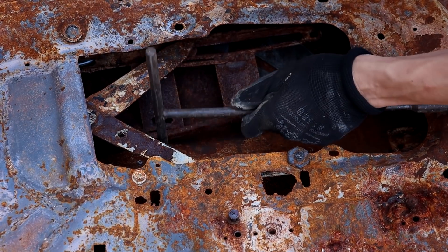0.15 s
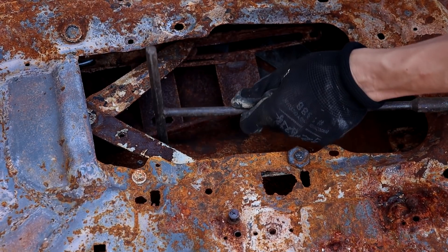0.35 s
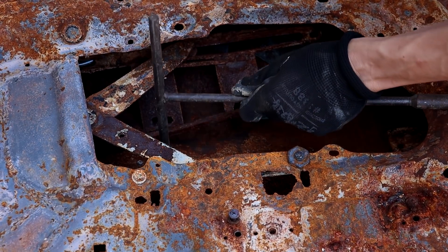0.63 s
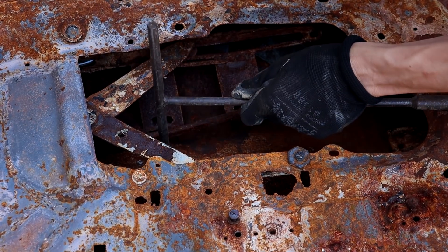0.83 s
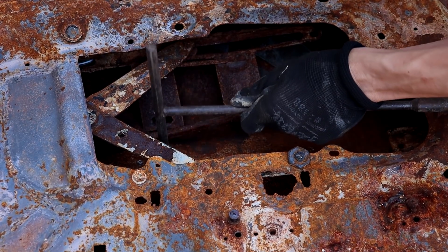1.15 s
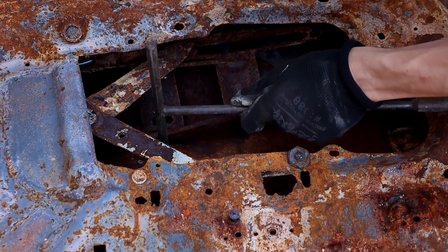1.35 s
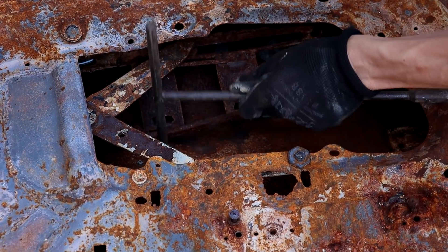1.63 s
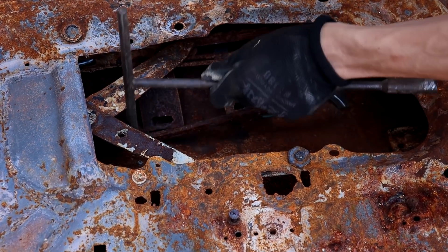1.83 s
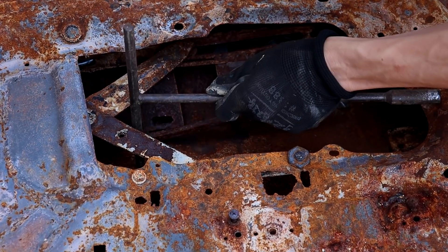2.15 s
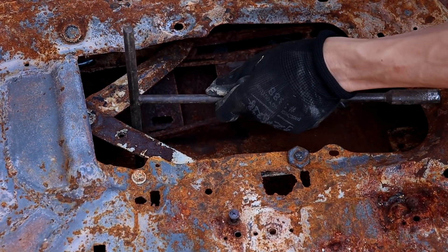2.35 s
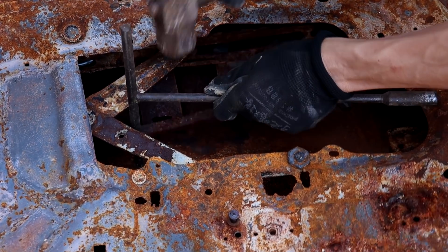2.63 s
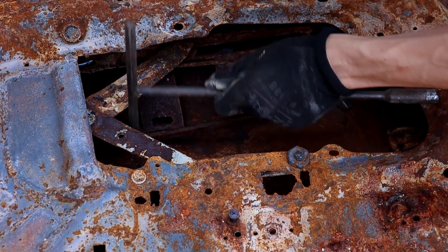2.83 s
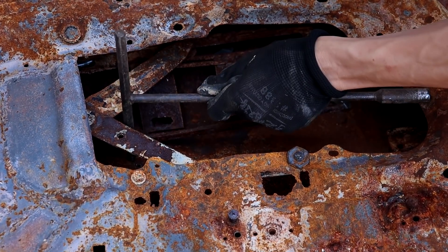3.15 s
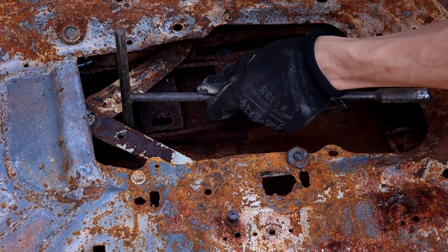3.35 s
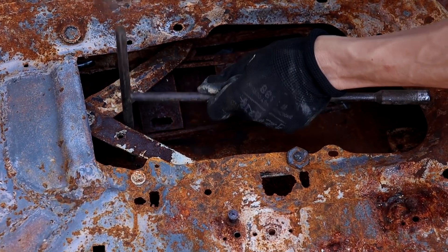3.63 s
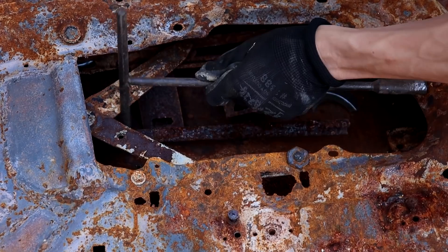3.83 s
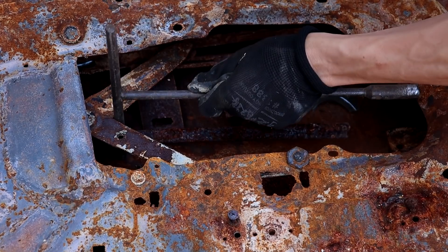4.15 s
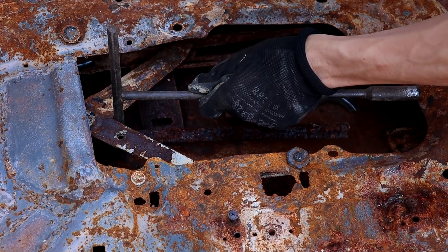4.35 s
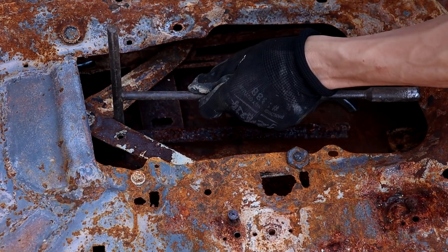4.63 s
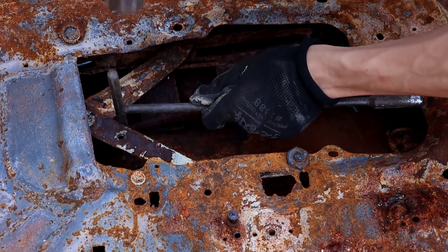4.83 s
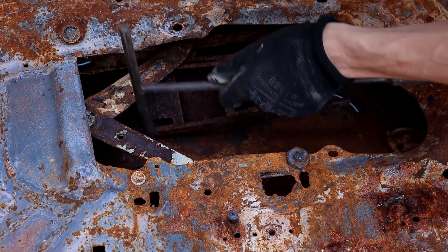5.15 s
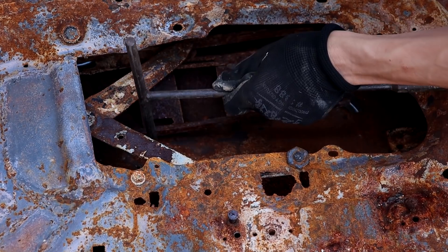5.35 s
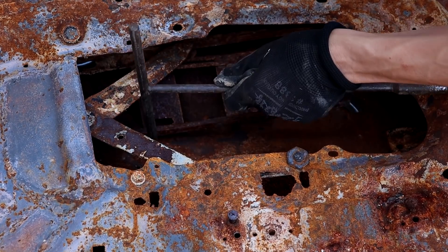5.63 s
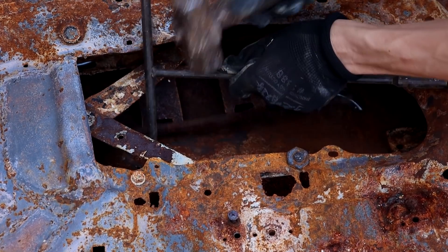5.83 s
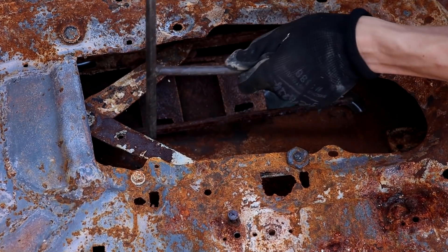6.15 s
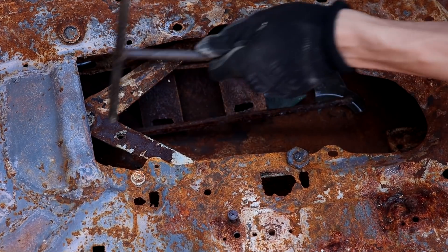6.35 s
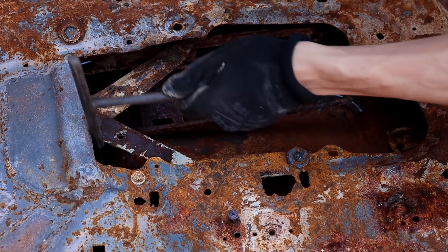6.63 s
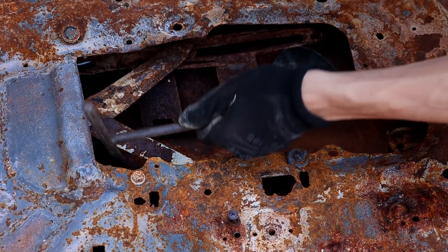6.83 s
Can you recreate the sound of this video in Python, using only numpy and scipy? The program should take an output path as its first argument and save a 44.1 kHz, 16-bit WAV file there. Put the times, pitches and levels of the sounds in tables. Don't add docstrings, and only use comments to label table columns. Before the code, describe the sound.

In a workshop, a hammer hits a steel rod against a hollow rusted sheet-metal body five times, about a second apart. Each blow is a sharp clipped crack with a short boom and a burst of rattling plates. Dull hollow thuds follow as the work drops back, and rust flakes tick down. The end has lighter knocks, rod ringing and a brief grating. Close stereo microphones, low machine murmur behind.

```python
import sys
import numpy as np
from scipy import signal
from scipy.fft import rfft, irfft, next_fast_len
from scipy.io import wavfile
from scipy.ndimage import uniform_filter1d

SR = 44100
rng = np.random.default_rng(int(sys.argv[2]) if len(sys.argv) > 2 else 0)


def transcribe(signal):
    frames = np.atleast_2d(signal).T
    limited = np.clip(frames, -1, 1)
    pcm = np.round(limited * 32767).astype(np.int16)
    wavfile.write(sys.argv[1], SR, pcm)


def amplitude_ratio(level_db):
    exponent = np.asarray(level_db, float) / 20
    return 10 ** exponent


N = 308259
TIME = np.arange(N) / SR
SIZE = next_fast_len(N + SR)
FREQ = np.maximum(np.arange(SIZE // 2 + 1) * SR / SIZE, 1)

# pitch_hz, level_db (per Hz)
SHOP_COLOUR = [(12, -42.5), (20, -12), (89, -3.5), (223, -5), (263, -10), (286, -17.5), (337, -3.5),
               (367, -11), (555, -12), (1460, -18), (1780, -17), (11700, -49), (15000, -60.5)]
# pitch_hz, side_minus_mid_db
SHOP_WIDTH = [(60, -25), (110, -27.5), (200, -13), (380, -6), (700, -5), (1290, 2.5), (2380, 2),
              (4400, 7.5), (8120, 7), (15000, 13.5)]
# time_s, gain_db
GAIN_DRIFT = [(0, 8.5), (.5, -1), (1.0, 0.5), (1.5, 4.5), (2.0, -1.5), (2.6, 2.5), (3.4, 0.5), (3.75, 2.5),
              (4.3, -2), (4.8, 5), (5.3, -2.5), (5.8, -5), (6.3, 0), (6.99, 1)]
SHOP_DB = -51
HUM_HZ, HUM_DB = 60, -58.5
DUCK_DB, DUCK_S = -10.5, 0.26

# pitch_hz, side_minus_mid_db
NEAR_WIDTH = [(60, -30.5), (110, -30.5), (200, -30.5), (380, -16), (700, -8.5), (1290, -3), (2380, 1.5),
              (4400, 4.5), (8120, 3.5), (15000, 9.5)]
# pitch_hz, left_minus_right_db
MICROPHONE_LEAN = [(60, -3), (110, 0.5), (200, -0.5), (380, 1.5), (700, 0), (1290, -1), (2380, -2.5),
                   (4400, 2), (8120, -1), (15000, -0.5)]

# time_s, level_db
GLOVE_LEVEL = [
    (0.63, -70),
    (0.676, -42.5),
    (0.726, -38.5),
    (0.758, -39),
    (0.822, -53),
    (0.86, -58.5),
]
# pitch_hz, level_db (per Hz)
GLOVE_COLOUR = [(530, -46), (900, -10.5), (2530, 1.5), (4540, -5.5), (4920, -9.5), (6710, -7),
                (11300, -13.5), (14000, -57)]
# time_s, pitch_hz
GLOVE_SQUEAK = [
    (0.66, 2160),
    (0.72, 2550),
    (0.76, 2940),
    (0.8, 2610),
]
SQUEAK_DB, SQUEAK_WIDTH_S = -6.5, 0.0027

# time_s, level_db
GRATE_LEVEL = [
    (6.735, -64.5),
    (6.765, -42),
    (6.8, -41.5),
    (6.84, -54),
    (6.88, -69.5),
]
# pitch_hz, level_db (per Hz)
GRATE_TONE = [(800, -19.5), (1500, -5.5), (2400, 1.5), (3700, -1.5), (4600, -15.5), (8500, -20),
              (12000, -33)]

# start_s, peak_db,
# centre_hz
TICKS_AND_CLANKS = [(0.5524, -52, 5200), (0.6478, -45, 4030), (0.8936, -40, 9230), (1.0994, -54, 4200),
                    (1.5894, -30, 4940), (1.8492, -48.5, 4540), (2.437, -50, 4350), (2.9041, -21, 7010),
                    (3.0046, -29.5, 7980), (3.02, -36.5, 9000), (2.92, -32.5, 9060), (3.113, -32.5, 7000),
                    (3.0694, -43, 5710), (3.3894, -57, 4440), (3.4292, -66, 5400), (3.441, -49.5, 5350),
                    (3.6681, -45.5, 4010), (3.7284, -50, 4715), (4.0402, -21.5, 4320), (4.473, -46.5, 4220),
                    (5.7129, -40, 4030), (6.284, -23.5, 1860), (6.31, -24, 1690), (6.7574, -44, 2600),
                    (6.79, -42, 2300)]
# start_s, pitch_hz, level_db, rise_s, t60_s
ROD_RINGS = [(.56, 302, -39.5, 0.075, 0.56), (1.52, 6420, -22, .002, 0.034),
             (2.115, 7230, -43, .003, 0.067), (3.77, 6250, -29, .005, 0.089), (3.795, 4340, -27, .01, 0.11),
             (3.87, 8890, -47, .04, 0.253), (3.888, 6008, -27.5, 0.011, .1),
             (3.899, 2620, -38.5, .05, 0.35), (3.931, 8300, -35, 0.015, 0.15),
             (4.005, 8300, -36, 0.023, 0.33), (5.567, 1794, -52, 0.062, .7), (5.61, 2380, -53, 0.019, 0.22),
             (5.72, 602, -46.5, .01, 0.35), (6.051, 7810, -45.5, 0.07, 0.44),
             (6.08, 6900, -48.5, .05, 0.37), (6.289, 3790, -42, 0.0036, .15),
             (6.29, 1700, -40, 0.009, 0.29), (6.29, 2256, -36, 0.0062, 0.25),
             (6.29, 5776, -56, 0.018, 0.63), (6.33, 3122, -55, 0.055, 0.93), (6.755, 3220, -44, .01, .12),
             (6.761, 3000, -39, 0.011, 0.29), (6.77, 3750, -45, .01, .12), (6.779, 2368, -30, 0.024, 0.2),
             (6.78, 1057, -39, 0.028, 0.27), (6.791, 2130, -38, .02, .13)]

# start_s, peak_db, panel_hz, edge_db, t60_s
DROPS = [(0.016, -22, 335, -54, 0.68), (0.134, -15, 323, -61.5, 0.12), (0.213, -17.5, 324, -41, 0.26),
         (0.23, -12.5, 318, -33, 0.17), (2.0467, -4.5, 325, -31.5, 0.21), (2.265, -32, 323, -50, 0.14),
         (2.753, -9.5, 333, -27.5, 0.13), (3.109, -6, 320, -36, 0.21), (4.272, -11, 318, -43, 0.091),
         (4.955, -9.5, 548, -30.5, 0.19), (5.2934, -13, 318, -37, 0.13), (5.717, -38.5, 715, -46, 0.14),
         (6.288, -37, 613, -50, 0.29), (6.302, -23, 544, -55, 0.35), (6.578, -21, 620, -20, 0.23)]
# start_s, peak_db, pitch_hz, t60_s
PLATE_KNOCKS = [(0.195, -32, 310, .08), (0.222, -21, 910, .06), (1.575, -22, 513, .12),
                (1.595, -17.5, 702, 0.14), (1.69, -25, 299, 0.21), (2.0479, -15, 506, .03),
                (2.052, -15, 630, 0.05), (2.265, -31, 875, .07), (2.856, -16.5, 550, 0.074),
                (3.1102, -5.5, 563, 0.045), (3.113, -11.5, 690, 0.058), (3.167, -20, 380, 0.055),
                (4.2733, -11.5, 569, 0.031), (4.277, -14.5, 660, .04), (4.316, -29, 400, .05),
                (4.331, -28, 332, .05), (4.985, -14.5, 2930, 0.048), (5.145, -23, 600, 0.038),
                (5.165, -27, 646, 0.12), (5.2985, -23, 322, 0.067), (5.317, -30, 550, .04),
                (5.336, -26, 310, 0.076), (6.581, -25.5, 846, .08), (6.596, -20, 548, .07),
                (6.652, -21.5, 636, 0.13)]
# pitch_hz, level_db, t60_s
BODY_MODES = [(307, 0, 0.33), (617, -6, 0.15), (934, -12, 0.36), (1666, -24, .4), (1690, -8.5, 0.64),
              (2440, -10, 0.16), (2390, -23.5, 0.06), (2530, -36.5, 0.19)]

# pitch_hz, level_db (per Hz)
SHEET_COLOUR = [(35, -61), (60, -9.5), (198, -5), (233, -4.5), (274, -4), (308, 0), (427, -7), (527, -3.5),
                (1010, -8), (1280, -9.5), (2580, -11), (4750, -24), (10800, -34.5), (13600, -43.5),
                (16000, -82)]
# pitch_hz, width_hz, level_db
PANEL_NOTES = [(310, 170, 4.5), (574, 120, 2), (964, 120, -2.5), (2620, 42, -18.5), (3200, 40, -8),
               (4380, 72, -12.5), (6100, 66, -15), (6270, 130, -26), (8560, 40, -8.5), (8890, 51, -28.5),
               (10740, 370, -27.5), (10700, 120, -39.5), (11700, 34, -34.5)]
# start_s, level_db, hold_s, fall_db_per_s, brightness_db
JOLT_RATTLES = [
    (1.528, -21.5, 0.18, 117, 0),
    (2.662, -23, 0.069, 105, 1.5),
    (3.772, -22.5, 0.24, 160, 1.5),
    (4.826, -23, 0.13, 128, 0),
    (5.834, -22.5, 0.18, 118, 1),
    (6.582, -19.5, 0.025, 135, -2.5),
]
# start_s, level_db, hold_s, fall_db_per_s, brightness_db
KNOCK_SHAKES = [(0.001, -31.5, .02, 111, -5.5), (0.135, -36.5, 0.03, 138, -13),
                (0.218, -24.5, 0.023, 128, -7.5), (0.865, -48, .03, 68, -4),
                (2.058, -25.5, 0.017, 126.5, -6.5), (2.268, -36, 0.0065, 131, -10),
                (2.436, -56.5, .01, 73, -8), (3.12, -20.5, 0.0076, 133, -8.5),
                (4.287, -24.5, 0.0064, 127, -12), (4.46, -50.5, 0.018, 116, -5.5),
                (5.31, -31.5, 0.027, 143, -6.5), (5.717, -49, 0.012, 127, -3.5),
                (6.286, -36.5, 0.025, 108, -6.5)]
# top_s, level_db, hold_s, fall_db_per_s, brightness_db
ROCKING_SWELLS = [(0.57, -50, 0.082, 98, -5.5), (1.09, -51.5, 0.038, 62, -9), (1.29, -54.5, 0.13, 60, -5.5),
                  (1.85, -43, 0.11, 42, -11), (2.03, -44, .01, 146, -4.5), (2.12, -47, 0.0042, 300, 5),
                  (1.7, -32.5, 0.0079, 157, 0), (3.94, -27.5, 0.0098, 200, 1.5),
                  (2.755, -23.5, 0.066, 88, 0), (2.85, -23.5, 0.014, 103, -1), (3.01, -38.5, 0.02, 90, 0.5),
                  (4.1, -38.5, 0.041, 55, -3.5), (4.205, -36, 0.026, 99.5, -7), (4.965, -24, 0.046, 101, 2),
                  (5.16, -41, 0.0091, 139, -20), (6.14, -45, 0.013, 132, 2.5),
                  (5.335, -42, .005, 151.5, -8), (5.62, -61, .02, 98.5, -8), (6.39, -49.5, .01, 122.5, -15),
                  (6.5, -59, 0.018, 99.5, -14), (6.79, -42.5, 0.0068, 151, 1)]
JOLT_RISE_S, SHAKE_RISE_S, ROCK_RISE_S = 0.004, 0.0073, 0.035
# time_s, deep_panel_db
DEEP_LEVEL = [(0, -3), (1.5, -2), (2.7, 0.5), (3.1, -1), (3.8, 0.5), (4.3, -2), (4.9, -1), (5.3, 0.5),
              (5.8, -1.5), (6.3, -2.5), (6.6, -5)]
DEEP_HZ = 410

PART_LEVEL_DB = (0.5, -2.5, -11.5, -18)
PART_BRIGHTNESS = (0, 1.01, 1.6, 2.2)
PART_FLASH_DB = (0.43, 2.9, 6.8, 4.4)
PART_SAG = (5.4, 2.5, 10, 25)
PART_FALL_SHARE = (1.01, 1.05, 1.3, 1.7)
FLASH_S = 0.017

CLINK_LO_HZ, CLINK_HI_HZ, CLINK_T60_S, CLINK_PER_S, CLINK_DB = 452, 6472, 0.045, 25, -4.5

# start_s, bang_db, boom_db, crack_db, thump_db
HAMMER_BLOWS = [
    (1.517, -2.5, -9.5, -9, -33.5),
    (2.655, -6.5, -9.5, -7, -28),
    (3.765, -7, -8.5, -5, -25.5),
    (4.819, -6.5, -10.5, -9.5, -23),
    (5.826, -3.5, -13, -8.5, -24),
]
# start_s, peak_db, pitch_hz, t60_s
PANEL_BOOMS = [(1.5191, -8.5, 326, .12), (1.519, -10.5, 985, .07), (2.6566, -6.5, 350, 0.069),
               (2.657, -6.5, 622, 0.064), (2.657, -13, 875, .05), (3.7671, -7.5, 367.5, .07),
               (3.7675, -7.5, 673, 0.042), (3.767, -21.5, 146.2, 0.17), (4.8211, -4, 371, 0.061),
               (4.8215, -5, 586, 0.043), (4.821, -20.5, 154.7, 0.18), (5.8269, -12, 342, 0.048),
               (5.8276, -7.5, 565, 0.054), (5.8269, -6.5, 1378, 0.045), (5.83, -24.5, 161.7, .25),
               (6.582, -31.5, 170, 0.23)]


def shape(table):
    hz, db = np.transpose(table)
    return amplitude_ratio(np.interp(np.log(FREQ), np.log(np.maximum(hz, 1)), db))


def follow(table):
    return np.interp(TIME, *np.transpose(table))


def fade(table):
    s, db = np.transpose(table)
    return amplitude_ratio(np.interp(TIME, s, db, -120, -120))


def colour(x, gain):
    return irfft(rfft(x, SIZE) * gain, SIZE)[..., :N]


def unit(x):
    return x / np.sqrt(np.mean(x ** 2))


def band(lo_hz, hi_hz):
    return 1 / np.sqrt((1 + (lo_hz / FREQ) ** 6) * (1 + (FREQ / hi_hz) ** 6))


def add(out, s, sound):
    i = int(s * SR)
    out[..., i:i + sound.shape[-1]] += sound[..., :N - i]


def spread(x):
    return colour(x, np.array([np.ones_like(FREQ), shape(NEAR_WIDTH)]))


def decay(t60, t):
    return np.exp(-np.log(1000) * t / t60)


def grains(per_s, spread_db, tail_s):
    k = int(SR / per_s)
    jumps = np.zeros(N)
    strength = np.minimum(rng.exponential(size=len(jumps[::k])), 2.6)
    jumps[::k] = amplitude_ratio(2 * spread_db * strength)
    power = signal.lfilter([1], [1, -np.exp(-1 / (tail_s * SR))], jumps)
    return rng.standard_normal((2, N)) * np.sqrt(power)


def ring(hz, t60, t, sharp=1):
    turn = np.array([[0], [2 * np.pi * rng.random()]])
    return np.sin(2 * np.pi * hz * t + turn) * decay(t60, t) * np.minimum(t * hz * sharp, 1)


def burst(t60, lo_hz, hi_hz, rise=0.00023):
    t = TIME[:SR // 4]
    sos = signal.butter(3, [lo_hz, min(hi_hz, 0.45 * SR)], "band", fs=SR, output="sos")
    noise = unit(signal.sosfilt(sos, rng.standard_normal((2, len(t)))))
    return noise * decay(t60, t) * np.minimum(t / rise, 1)


def patchy(x, depth_db, width_hz):
    bins = x.shape[-1] // 2 + 1
    k = max(int(width_hz * x.shape[-1] / SR), 1)
    gain = amplitude_ratio(depth_db * unit(uniform_filter1d(rng.standard_normal(bins), k)))
    return irfft(rfft(x) * gain / np.sqrt(np.mean(gain ** 2)), x.shape[-1])


def shop():
    width = np.array([np.ones_like(FREQ), shape(SHOP_WIDTH)])
    noise = colour(rng.standard_normal((2, N)), shape(SHOP_COLOUR) * width)
    murmur = amplitude_ratio(SHOP_DB) * noise / np.std(noise[0])
    waver = 1 + 0.23 * unit(uniform_filter1d(rng.standard_normal(N), SR // 8))
    hum = amplitude_ratio(HUM_DB) * waver * np.sin(2 * np.pi * HUM_HZ * TIME)
    duck = np.zeros(N)
    for s, *_ in HAMMER_BLOWS:
        duck += np.where(TIME > s, np.clip(1 - (TIME - s) / DUCK_S, 0, 1), 0)
    return (murmur + np.array([hum, 0.2 * hum])) * amplitude_ratio(DUCK_DB * duck + follow(GAIN_DRIFT))


def glove():
    rub = unit(colour(grains(500, 2.5, 0.0063), shape(GLOVE_COLOUR)))
    turn = 2 * np.pi * np.cumsum(follow(GLOVE_SQUEAK)) / SR
    slow = unit(uniform_filter1d(rng.standard_normal((2, 2, N)), int(SQUEAK_WIDTH_S * SR)))
    squeak = slow[0] * np.cos(turn) + slow[1] * np.sin(turn)
    mid, side = (rub + amplitude_ratio(SQUEAK_DB) * squeak) * fade(GLOVE_LEVEL)
    return np.array([mid, 0.8 * side - 0.9 * np.roll(mid, 3)])


def grate():
    return unit(colour(grains(400, 2.5, 0.005), shape(GRATE_TONE))) * fade(GRATE_LEVEL)


def flakes():
    out = np.zeros((2, N))
    for s, db, hz in TICKS_AND_CLANKS:
        tick = burst(0.05, 0.5 * hz, 2 * hz, rise=0.001)
        wisp = burst(0.14, 0.5 * hz, 2 * hz, rise=0.0021)
        add(out, s, amplitude_ratio(db - 8) * (0.71 * tick + 0.39 * wisp))
    return out


def rod():
    out, t = np.zeros((2, N)), TIME[:SR // 2]
    for s, hz, db, rise, t60 in ROD_RINGS:
        chatter = amplitude_ratio(2 * unit(uniform_filter1d(rng.standard_normal(len(t)), SR // 70)))
        add(out, s, amplitude_ratio(db) * chatter * np.minimum(t / rise, 1) * ring(hz, t60, t))
    return out


def thuds():
    out, t = np.zeros((2, N)), TIME[:SR // 4]
    for s, db, panel_hz, edge_db, t60 in DROPS:
        body = np.zeros((2, len(t)))
        for hz, mode_db, mode_t60 in BODY_MODES[1:]:
            detuned_hz = hz * (1 + 0.046 * rng.standard_normal())
            body += amplitude_ratio(mode_db) * ring(detuned_hz, 0.68 * mode_t60, t)
        knock = 0.61 * ring(panel_hz, t60, t) + 0.23 * body * np.minimum(t / 0.0067, 1)
        knock += 0.15 * burst(0.06, 170, 770, rise=0.0062)
        knock += 0.81 * ring(panel_hz, 0.11, t) + 0.3 * burst(0.011, 260, 1020, rise=0.0006)
        edge = burst(0.084, 810, 7000, rise=0.0018)
        add(out, s, amplitude_ratio(db - 6) * knock + amplitude_ratio(edge_db - 4.5) * edge)
    for s, db, hz, t60 in PLATE_KNOCKS:
        add(out, s, amplitude_ratio(db) * ring(hz, t60, t, sharp=3.4))
    return out


def clinks(count):
    out = np.zeros((2, N))
    pitches = np.geomspace(CLINK_LO_HZ, CLINK_HI_HZ, count) * (1 + 0.03 * rng.standard_normal(count))
    for hz in pitches:
        hits = (rng.random(N) < CLINK_PER_S / SR) * rng.standard_normal(N)
        pole = np.exp(2j * np.pi * hz / SR - np.log(1000) / (CLINK_T60_S * SR))
        turn = np.exp(2j * np.pi * np.array([[0], [rng.random()]]))
        out += np.imag(signal.lfilter([1], [1, -pole], hits) * turn)
    return out


def loose_parts():
    bumps = sum(amplitude_ratio(db) / (1 + (2 * (FREQ - hz) / width) ** 2) for hz, width, db in PANEL_NOTES)
    sheet = shape(SHEET_COLOUR) + amplitude_ratio(-21.5) * bumps
    panels = unit(colour(grains(250, 1.8, 0.013), sheet * band(200, 994)))
    plates = unit(colour(grains(300, 1.6, 0.034), sheet * band(810, 4700)))
    rust = unit(colour(grains(500, 2.6, 0.007), sheet * band(4700, 8700)))
    grit = unit(colour(grains(60, 2.7, 0.0058), sheet * band(9500, 15000)))
    scraps = clinks(count=28)
    panels += amplitude_ratio(CLINK_DB - 4) * unit(colour(scraps, sheet * band(200, 780)))
    plates += amplitude_ratio(CLINK_DB) * unit(colour(scraps, sheet * band(1300, 6500)))
    return np.array([panels, plates, rust, grit])


def clatter():
    parts = loose_parts()
    deep = colour(parts[0], band(23, DEEP_HZ))
    out, t = np.zeros((2, N)), TIME[:24576]
    columns = (PART_LEVEL_DB, PART_BRIGHTNESS, PART_FLASH_DB, PART_SAG, PART_FALL_SHARE)
    part, bright, flash, sag, fall = (np.array(c)[:, None] for c in columns)
    kinds = ((JOLT_RATTLES, JOLT_RISE_S, 1), (KNOCK_SHAKES, SHAKE_RISE_S, 1), (ROCKING_SWELLS, ROCK_RISE_S, 0))
    for rows, rise, struck in kinds:
        after = np.maximum(t - rise, 0)
        edge = np.minimum(t / rise, 1) ** 2 * np.minimum((t[-1] - t) * 20, 1)
        for s, db, hold, fall_db, bright_db in rows:
            level_db = db + part + bright * bright_db
            level_db = level_db + struck * flash * np.exp(-after / FLASH_S)
            level_db = level_db - sag * np.minimum(after, hold)
            level_db = level_db - fall * fall_db * np.maximum(after - hold, 0)
            i = rng.integers(N - len(t))
            loose = parts[..., i:i + len(t)].copy()
            deep_gain = amplitude_ratio(np.interp(s, *np.transpose(DEEP_LEVEL)))
            loose[0] += (deep_gain - 1) * deep[:, i:i + len(t)]
            shaken = patchy(loose, depth_db=2, width_hz=80)
            add(out, max(s - rise, 0), np.sum(shaken * (edge * amplitude_ratio(level_db))[:, None], axis=0))
    return out


def blows():
    out, t = np.zeros((2, N)), TIME[:SR // 4]
    for s, bang_db, boom_db, crack_db, thump_db in HAMMER_BLOWS:
        crack = burst(0.0055, 3500, 9500, rise=0.0001) + 0.078 * burst(0.05, 3500, 14000)
        bang = 1.7 * ring(2200, 0.0015, t) + burst(0.021, 1200, 4500)
        bang += 0.62 * burst(0.093, 930, 2700)
        boom = 0.89 * burst(0.05, 250, 780)
        thump = burst(0.23, 120, 220, rise=0.0031)
        add(out, s, amplitude_ratio(thump_db) * thump)
        add(out, s + 0.00083, amplitude_ratio(crack_db + 8.5) * crack + amplitude_ratio(bang_db - 2) * bang)
        add(out, s + 0.0014, amplitude_ratio(boom_db + 3) * boom)
    for s, db, hz, t60 in PANEL_BOOMS:
        add(out, s, amplitude_ratio(db) * ring(hz, t60, t, sharp=3))
    return out * np.array([[1], [0.65]])


def scene():
    near = glove() + grate() + flakes() + rod() + thuds() + clatter() + blows()
    mid, side = shop() + spread(near)
    lean = np.sqrt(shape(MICROPHONE_LEAN))
    return colour(np.array([mid + side, mid - side]), np.array([lean, 1 / lean]))


def low_pass(x):
    return signal.sosfilt(signal.butter(12, 16150, fs=SR, output="sos"), x)


def record(dry):
    mix = np.clip(dry, -1, 1)
    return low_pass(mix)


dry = scene()
out = record(dry)
transcribe(out)
```